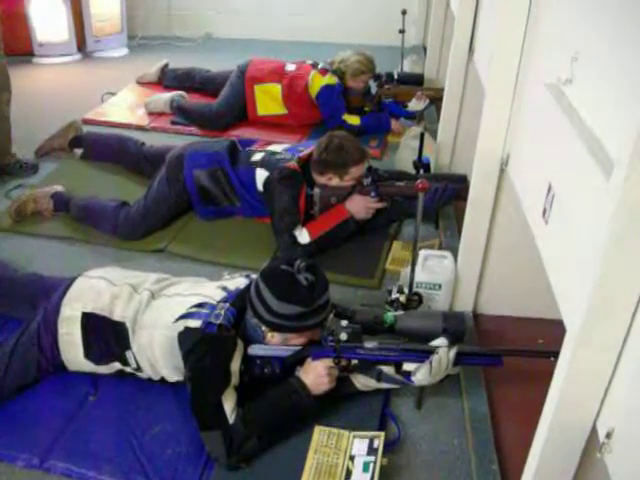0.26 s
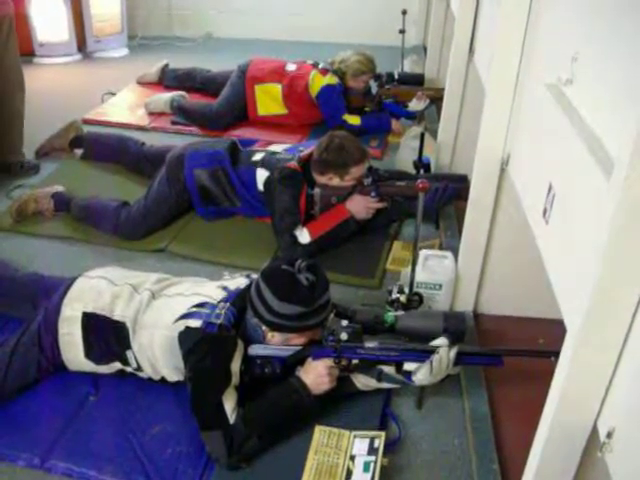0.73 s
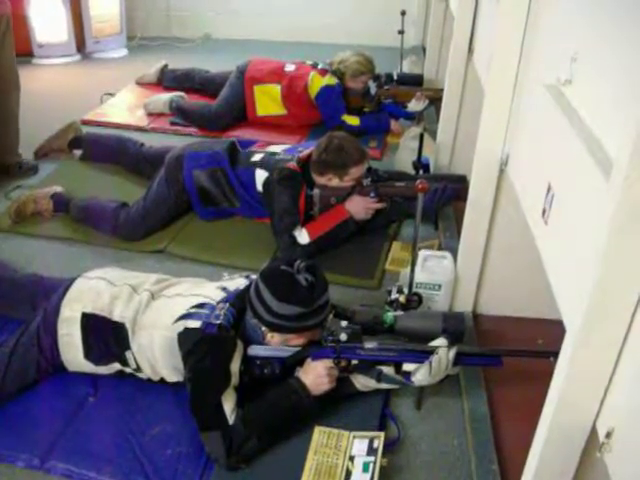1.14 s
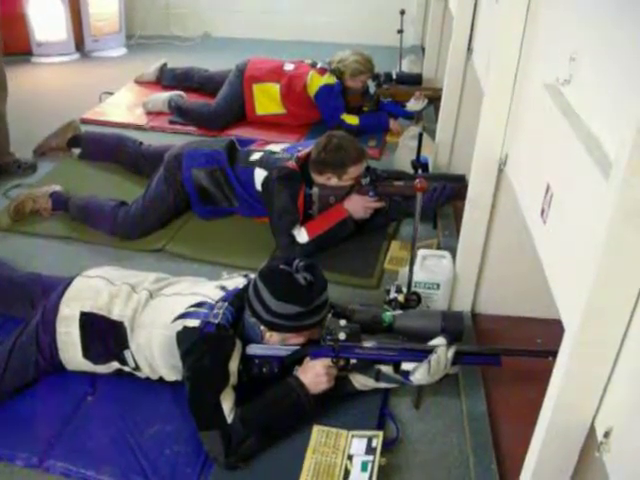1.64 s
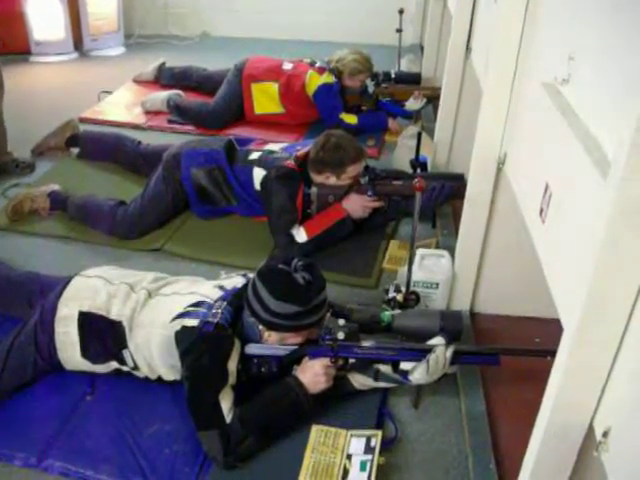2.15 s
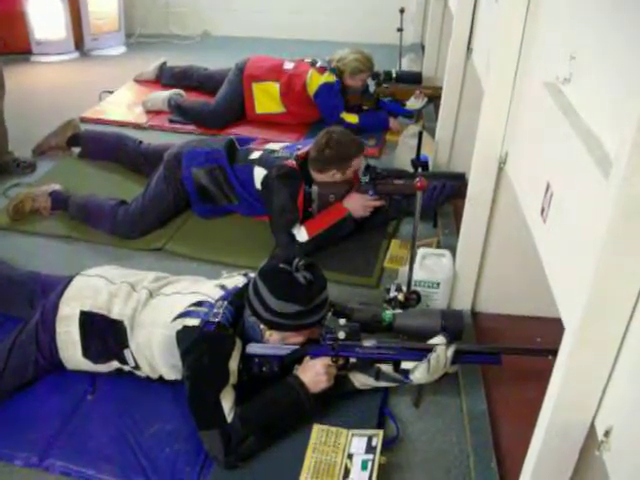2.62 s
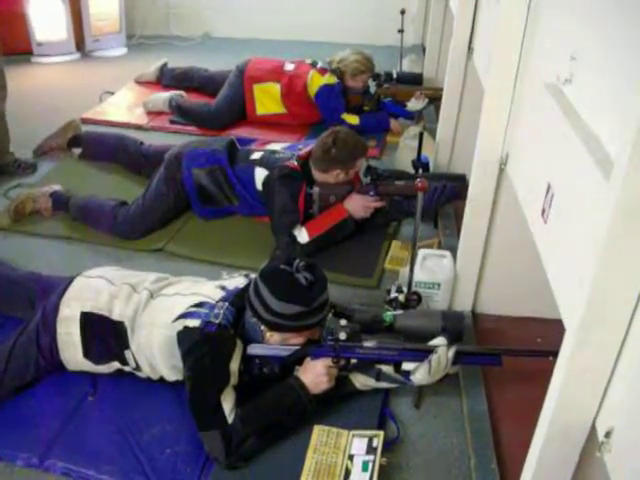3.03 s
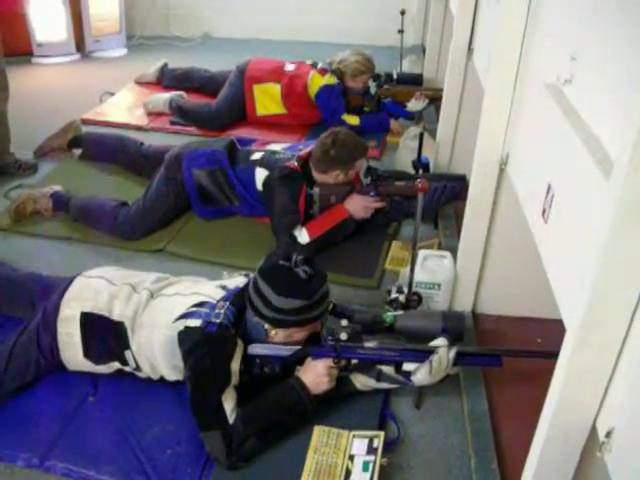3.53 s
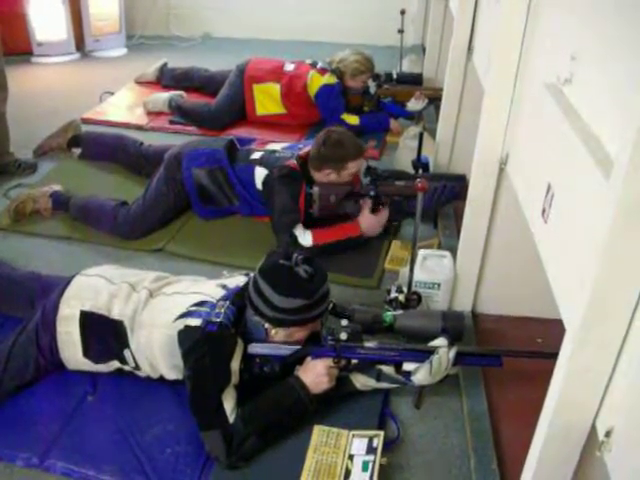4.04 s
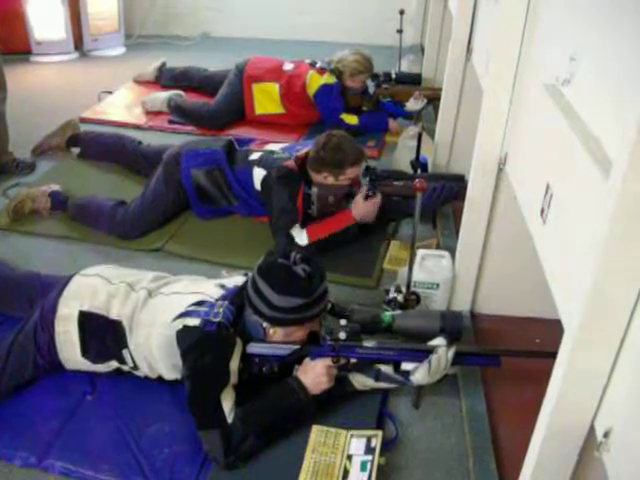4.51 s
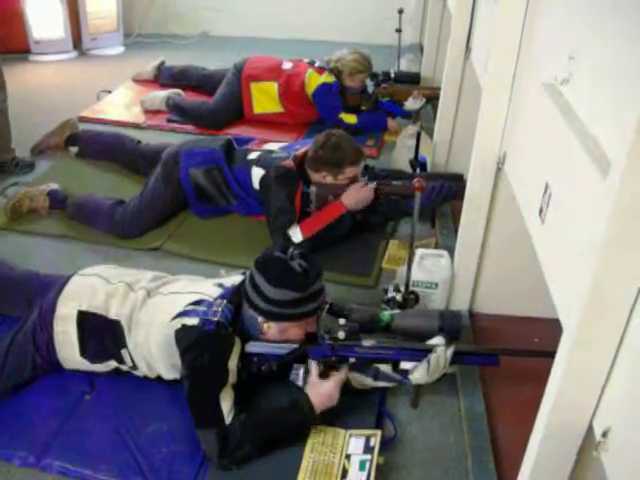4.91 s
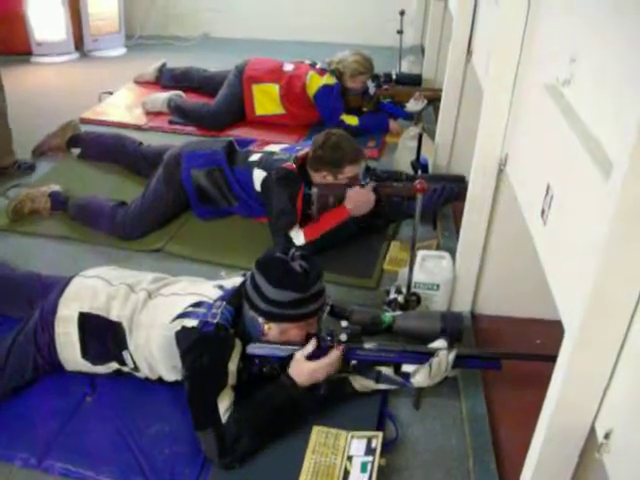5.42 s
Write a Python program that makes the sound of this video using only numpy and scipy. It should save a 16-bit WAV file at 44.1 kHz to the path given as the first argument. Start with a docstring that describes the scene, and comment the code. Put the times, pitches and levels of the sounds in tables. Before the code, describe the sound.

Two small-calibre rifle shots crack about two seconds apart in a narrow, hard-walled indoor range. Each leaves a loud, bright echo that holds briefly and then fades, with the bullet's strike on a distant steel trap blended in. After a pause, rifle bolts click, rattle and snap shut with light wooden knocks. The microphone is near the shooters, and ventilation, hiss, hum and a thin high whine continue underneath.

```python
"""A narrow indoor shooting range with hard walls, where two smallbore rifles are fired.
Each shot cracks and echoes down the range, then its bullet strikes the steel trap at the far end.
An automatic gain control holds the loud echo level for about half a second before it is heard to fade.
Afterwards the rifle bolts are worked: steel clicks, the wooden stock thumps, and a faint tick follows.
Ventilation, hiss, mains hum and a thin electronic whine lie underneath."""
import sys
import numpy as np
from scipy import signal
from scipy.io import wavfile

SR = 44100
rng = np.random.default_rng(int(sys.argv[2]) if len(sys.argv) > 2 else 0)


def wav_out(sig):
    """Save sig, one row per channel (or a flat mono array), as 16-bit PCM at SR to the path in sys.argv[1]."""
    wavfile.write(sys.argv[1], SR, np.round(np.clip(np.atleast_2d(sig).T, -1, 1) * 32767).astype(np.int16))


N = 249910
TIME = np.arange(N) / SR

# tone colour of the ventilation, then of the hiss: pitch_hz, relative_db
VENT_COLOUR = [(20, -18), (31, -6), (40, -5.5), (55, -7.5), (79, -9), (100, -10), (125, -14.5),
               (240, -16.5), (340, -14.5), (520, -18.5), (900, -22), (2000, -24.5), (6500, -27.5),
               (8450, -53)]
HISS_COLOUR = [(4500, -34), (6500, 8), (8800, 5.5), (10000, 3.5), (11500, -2.5)]
# steady hum and whine: pitch_hz, level_db
TONES = [(58.5, -49), (100, -43.5), (7089.1, -38.5), (7890, -60)]
# ringing notes of the wooden stock: pitch_hz, relative_db, fade_s (time to fall by 60 dB)
STOCK_NOTES = [(263, -4, 0.45), (311, 4, 0.17), (404, -3, 0.25)]
# tone colour of steel hitting steel: pitch_hz, relative_db
STEEL_COLOUR = [(100, -17), (350, -9), (700, -1), (1300, 4), (1800, -1), (2400, 2.5), (4200, -0.5),
                (6000, -2), (7800, 4), (9200, -1), (11500, -14)]
# bolt clicks, then one faint dull tick: start_s, level_db, treble_db, ring_hz
CLICKS = [(4.8328, -25, 19, 9030), (5.0852, -32, 1, 1320), (5.128, -26, 13, 5000), (5.1346, -10.5, 2, 3220),
          (5.1805, -7.7, 4.5, 4460), (5.3612, -30.5, -6, 1350), (5.393, -18.3, 5.5, 9200),
          (5.4128, -2, 6.5, 8800), (5.599, -32, -3, 2160)]
# how long sound lingers in the shooter's booth, then in the long range: pitch_hz, fade_s
BOOTH_FADE = [(200, 1), (1000, 0.47), (3000, 0.55), (6000, 0.43), (11000, 0.26)]
RANGE_FADE = [(60, 1.02), (250, 1.3), (500, 1.77), (1100, 2.02), (2700, 1.81), (4200, 1.416), (6000, 1.245),
              (8500, 0.72), (11500, 0.59)]
# tone colour of a bullet hitting the steel trap: pitch_hz, relative_db
TRAP_COLOUR = [(65, -12.5), (150, -14), (260, -7.5), (420, -0.5), (560, -6), (720, -1.5), (1170, 0),
               (1850, -2.5), (2550, 0.5), (3250, -9), (4000, 0.5), (5000, -19), (8000, -3), (11500, -20)]
# tone colour of the muzzle blast: pitch_hz, relative_db
BLAST_COLOUR = [(30, 2), (120, 2), (220, -1), (420, -1), (650, -2.5), (1500, -3.5), (2200, 0), (4000, 4),
                (5200, 4.5), (6500, -1.5), (8000, 10), (9300, 0), (11500, -9)]
# pitches made louder or softer in each shot: pitch_hz, width_hz, first_shot_db, second_shot_db
SHOT_BANDS = [(370, 124, 8, 8), (1063, 250, 1.5, 9), (2740, 650, 5.5, 6), (5160, 1300, -5.5, -0.5)]
# the shots: start_s, tail_db, crack_db, floor_delay_s, floor_share (0 to 1), treble_db, trap_db
SHOTS = [(0.288, 8.5, 15, 0.00077, 0.34, 0, 6), (2.4848, 7.5, 16.5, 0.000738, 0.39, 2, -9)]
# edges of the noise bands, three to an octave: pitch_hz
BAND_EDGES = 20 * 2 ** (np.arange(29) / 3)
BAND_FILTERS = [signal.butter(2, band, "band", fs=SR, output="sos")
                for band in zip(BAND_EDGES, BAND_EDGES[1:])]
# a fade too slow to hear: pitch_hz, fade_s
NO_FADE = [(1, 1e9)]


def from_db(db):
    """Turn decibels into a number to multiply by."""
    return 10 ** (np.asarray(db) / 20)


def at_hz(points, hz):
    """Read between the rows of a table, with octaves evenly spaced."""
    table = np.array(points)
    return np.interp(np.log(hz), np.log(table[:, 0]), table[:, 1])


def add(out, start_s, sound):
    """Mix a sound in at its start time."""
    start = int(round(start_s * SR))
    out[start:start + len(sound)] += sound[:N - start]


def fading_noise(colour, fades, size):
    """Bands of noise, each fading at its own rate; together they start at a strength of about 1."""
    run_in = SR // 10   # lets the filters settle
    white = rng.standard_normal((2, size + run_in))
    out, power = np.zeros(size), 0
    for k, (low, high, band_filter) in enumerate(zip(BAND_EDGES, BAND_EDGES[1:], BAND_FILTERS)):
        hz = np.sqrt(low * high)
        gain = from_db(at_hz(colour, hz))
        fade = np.exp(-np.log(1000) / at_hz(fades, hz) * TIME[:size])
        out += gain * fade * signal.sosfilt(band_filter, white[k % 2])[run_in:]
        power += gain ** 2 * 2 * (high - low) / SR
    return out / np.sqrt(power)


def steady_noise(colour):
    """Noise that never fades, with an average strength of 1."""
    noise = fading_noise(colour, NO_FADE, N)
    return noise / np.sqrt(np.mean(noise ** 2) + 1e-20)


def burst(colour, length_s):
    """A tiny puff of noise: the sound of a blow coming straight to the ear."""
    t = TIME[:SR // 20]
    return fading_noise(colour, NO_FADE, len(t)) * np.exp(-(t / length_s) ** 2)


def adjust_band(x, hz, width_hz, change_db):
    """Turn one band of pitches up or down, leaving the rest alone."""
    tuning = -2 * np.cos(2 * np.pi * hz / SR)
    width = np.pi * width_hz / SR
    gain = from_db(change_db / 2)
    forward = [1 + width * gain, tuning, 1 - width * gain]
    feedback = [1 + width / gain, tuning, 1 - width / gain]
    return signal.lfilter(forward, feedback, x)


def tilt(x, treble_db, corner_hz=5500):
    """Tip the balance between highs and lows: plus is brighter, minus is duller."""
    low = signal.lfilter(*signal.butter(1, corner_hz, fs=SR), x)
    return low * from_db(-treble_db / 2) + (x - low) * from_db(treble_db / 2)


def echo(x, delay_s, share):
    """Add one late copy, which weakens evenly spaced pitches and sounds hollow."""
    t = TIME[:len(x)]
    late = np.interp(t - delay_s, t, x, left=0)
    return (x + share * late) / np.sqrt(1 + share ** 2)


def early_echoes(size, spread_db, merge_s):
    """A wobble in level: separate wall echoes are lumpy at first, then merge as they multiply."""
    t = TIME[:size]
    points_s = np.arange(0, t[-1], .002)
    wobble = np.interp(t, points_s, rng.standard_normal(len(points_s)))
    return from_db(spread_db * np.exp(-t / merge_s) * wobble)


def background(vent_db=-39.5, hiss_db=-45.5):
    """Ventilation and hiss are steady noise; the hum and whine are pure tones."""
    tones = sum(from_db(db) * np.sqrt(2) * np.sin(2 * np.pi * (hz * TIME + rng.random()))
                for hz, db in TONES)
    vent = from_db(vent_db) * steady_noise(VENT_COLOUR)
    hiss = from_db(hiss_db) * steady_noise(HISS_COLOUR)
    return vent + hiss + tones


def stock_thump(level_db):
    """A knock sets the wooden stock ringing at a few low notes."""
    t = TIME[:int(.6 * SR)]
    return sum(from_db(level_db + db - 60 * t / fade_s) * np.sin(2 * np.pi * hz * t)
               for hz, db, fade_s in STOCK_NOTES)


def steel_click(level_db, treble_db, ring_hz=3000, ring_db=0, width_hz=650, booth_db=-7.6, wall_s=.0115):
    """Steel snaps on steel and bounces once; the nearby walls answer a moment later."""
    t = TIME[:int(.6 * SR)]
    arrival = 1 - np.exp(-(t / wall_s) ** 2)
    walls = fading_noise(STEEL_COLOUR, BOOTH_FADE, len(t))
    walls *= early_echoes(len(t), spread_db=1.5, merge_s=.02)
    # the struck part's ring colours the click more than its echoes
    sound = adjust_band(from_db(booth_db) * arrival * walls, ring_hz, width_hz, ring_db / 2)
    click = burst(STEEL_COLOUR, length_s=.0042)
    add(sound, 0, adjust_band(click, ring_hz, width_hz, ring_db))
    bounced = echo(tilt(sound, treble_db), delay_s=.0024, share=.15)
    return from_db(level_db) * bounced


def bolt_rattle(start_s=5.1435, level_db=-23, touches=4, gap_s=.0088, loss_db=2.2):
    """The sliding bolt taps its guide in a quick, uneven, fading run that keeps it ringing."""
    out = np.zeros(N)
    for k, unevenness in enumerate(rng.uniform(.9, 1.1, touches)):
        tap = steel_click(level_db - loss_db * k, treble_db=-12, ring_hz=3150, ring_db=18)
        add(out, start_s + gap_s * k * unevenness, tap)
    return out


def bolts(knock_s=4.846, stock_db=-31):
    """A lifted handle knocks the stock; the bolts click, rattle and snap; one faint dull tick follows."""
    out = bolt_rattle()
    add(out, knock_s, steel_click(level_db=-24.5, treble_db=-9) + stock_thump(level_db=-27.5))
    for start_s, level_db, treble_db, ring_hz in CLICKS:
        ring_db = 9.5 - .14 * level_db   # the lighter the touch, the more one part rings alone
        click = steel_click(level_db, treble_db, ring_hz, ring_db)
        add(out, start_s, click + stock_thump(level_db + stock_db))
    return out


def trap_strike(t, level_db, swell_s=.047):
    """The bullet hits the steel trap, and the sound swells back from the far end."""
    swell = 1 - np.exp(-t / swell_s)
    return from_db(level_db) * swell * fading_noise(TRAP_COLOUR, RANGE_FADE, len(t))


def muzzle_blast(t, shot_number, tail_db, crack_db, rise_s=.0022):
    """A sharp crack and a long tail of wall echoes, with a few pitches made louder or softer."""
    lumps = early_echoes(len(t), spread_db=2.0, merge_s=.23)
    blast = from_db(tail_db) * lumps * fading_noise(BLAST_COLOUR, RANGE_FADE, len(t))
    crack = tilt(burst(BLAST_COLOUR, length_s=.0061), treble_db=-9)
    add(blast, 0, from_db(crack_db) * crack)
    blast *= 1 - np.exp(-(t / rise_s) ** 2)
    for hz, width_hz, *changes_db in SHOT_BANDS:
        blast = adjust_band(blast, hz, width_hz, changes_db[shot_number])
    return blast


def shots(trap_delay_s=.095):
    """Each rifle fires, and its bullet is heard hitting the trap a moment later."""
    out, t = np.zeros(N), TIME[:int(2.2 * SR)]
    for shot_number, shot in enumerate(SHOTS):
        start_s, tail_db, crack_db, floor_delay_s, floor_share, treble_db, trap_db = shot
        blast = muzzle_blast(t, shot_number, tail_db, crack_db)
        # the muzzle lies close to the floor, whose echo makes the whole tail hollow
        hollow = echo(blast, floor_delay_s, floor_share)
        add(out, start_s, tilt(hollow, treble_db))
        add(out, start_s + trap_delay_s, trap_strike(t, trap_db))
    return out


def scene():
    """Shots, bolts and background together in one channel."""
    return (shots() + bolts() + background())[None, :]


def gain_control(x, ceiling_db=-14.0, release_db_per_s=170, sense_s=.012, lead_s=.0012):
    """Turn loud sound down, too slowly to catch a whole crack, and back up as it fades."""
    memory = np.exp(-1 / (sense_s * SR))
    smoothed_power = signal.lfilter([1 - memory], [1, -memory], x ** 2)
    level_db = 10 * np.log10(smoothed_power + 1e-12)
    excess_db = np.maximum(level_db - ceiling_db, 0)
    release_db = release_db_per_s * TIME
    cut_db = np.maximum.accumulate(excess_db + release_db) - release_db
    return x * from_db(-np.interp(TIME + lead_s, TIME, cut_db))


def record(dry, offset=-0.023, rolloff_hz=10300, input_top_hz=12600, peak_limit=.7, cutoff_hz=16000):
    """Dull the highs, nudge the wave off centre, hold the level, clip the peaks and trim the very top."""
    dulled = signal.sosfilt(signal.butter(5, rolloff_hz, fs=SR, output="sos"), dry[0])
    narrowed = signal.sosfilt(signal.cheby2(14, 50, input_top_hz, fs=SR, output="sos"), dulled)
    clipped = np.clip(gain_control(narrowed + offset), -peak_limit, peak_limit)
    return signal.sosfilt(signal.cheby2(14, 50, cutoff_hz, fs=SR, output="sos"), clipped)[None, :]


dry = scene()
out = record(dry)
wav_out(out)
```